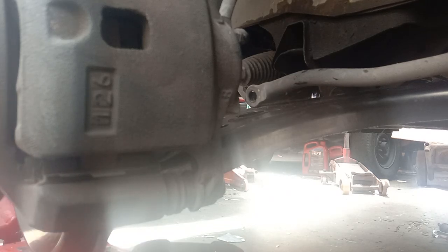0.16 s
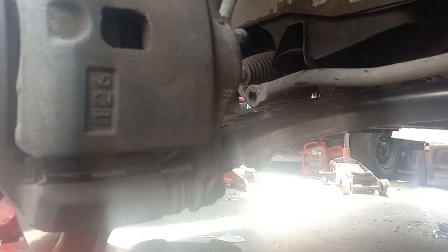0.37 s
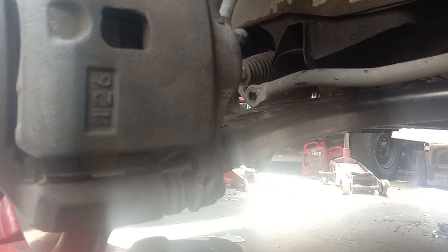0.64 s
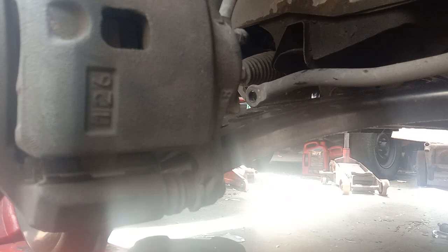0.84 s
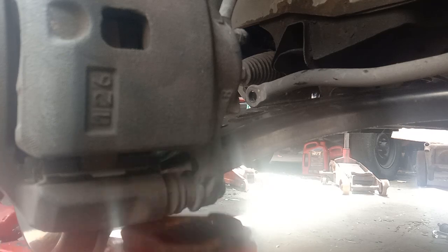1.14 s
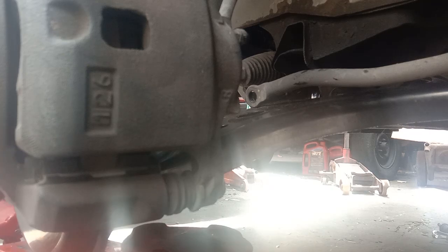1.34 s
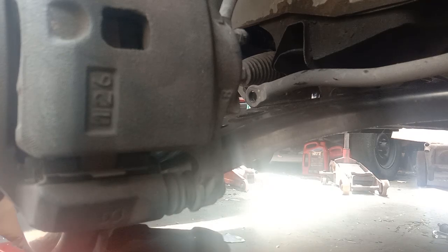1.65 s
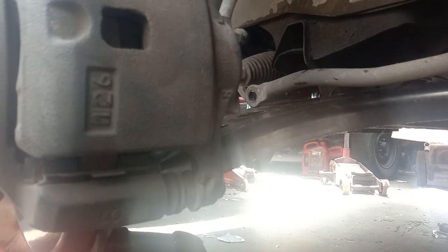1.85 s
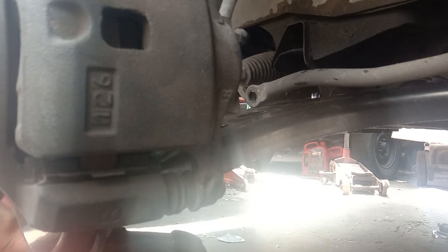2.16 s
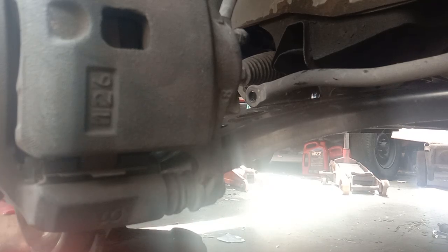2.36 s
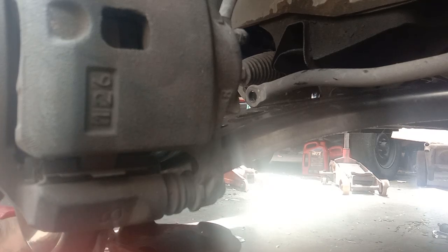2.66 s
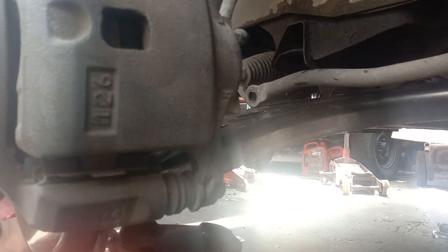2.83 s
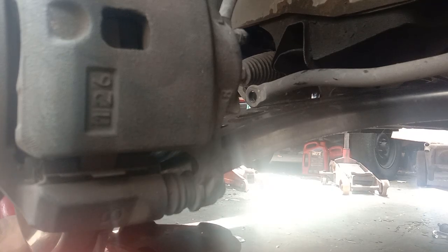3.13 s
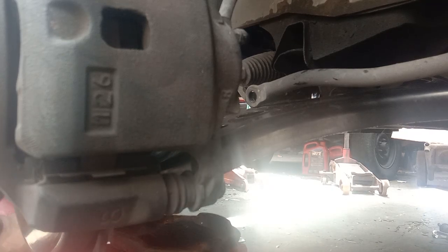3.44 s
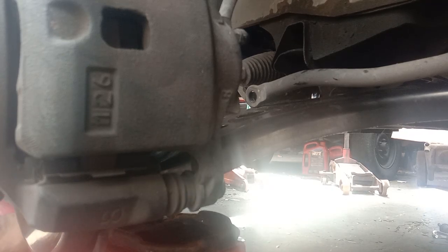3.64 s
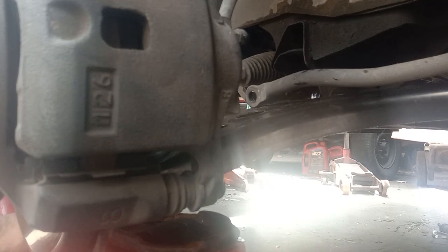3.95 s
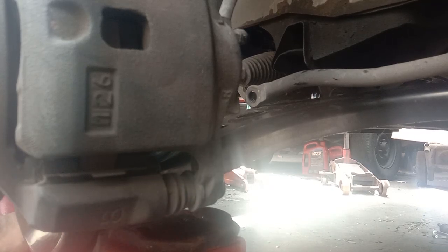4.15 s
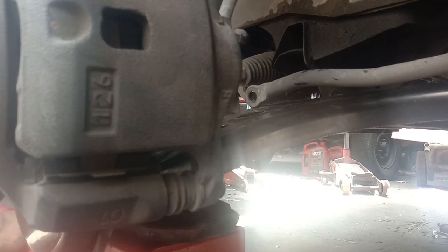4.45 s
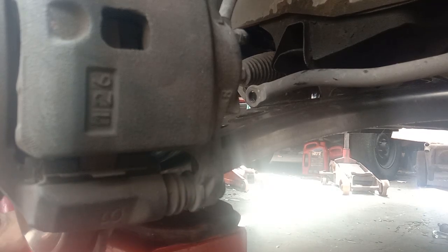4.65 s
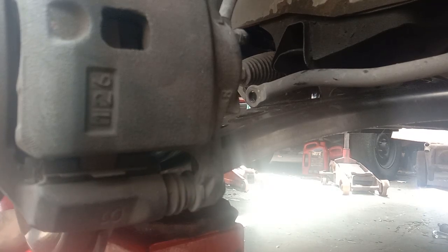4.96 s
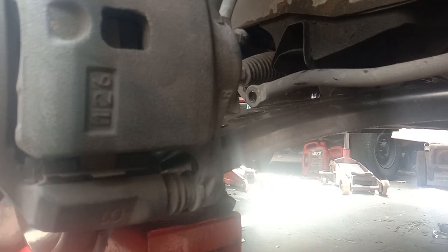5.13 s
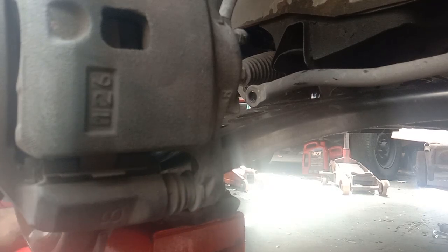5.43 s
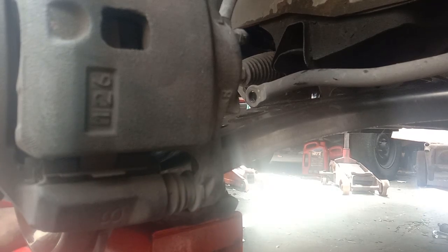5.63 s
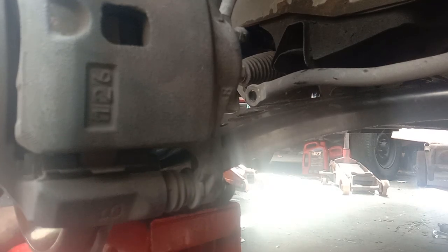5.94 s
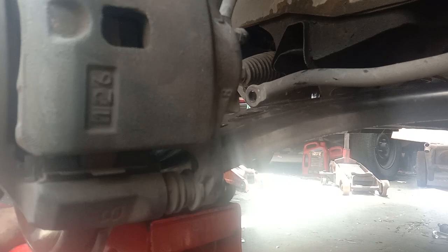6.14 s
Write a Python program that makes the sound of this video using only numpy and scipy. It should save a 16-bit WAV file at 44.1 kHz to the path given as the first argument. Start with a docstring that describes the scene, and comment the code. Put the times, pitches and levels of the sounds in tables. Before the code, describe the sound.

Close under a car in a hard-walled garage, a hydraulic jack is pumped four times, about one second apart. Each stroke has a brief gritty handle scrape and a heavy hollow metal bang, with bright linkage clanks on most strokes. The car body shudders and groans afterward. Then only ticks and dull suspension knocks remain, ending in a soft saddle rattle. Low rumble and faint hiss lie beneath.

```python
"""A hydraulic floor jack pumped under a car in a garage, heard from close to the wheel hub.
The handle scrapes (trains of slips) and bangs on its bottom stop (banded noise plus frame modes).
The linkage clanks and, last, the saddle rattles into its seat: contact noise, large-part ring, small-part ping.
Joints tick (short clicks), the suspension knocks (pitched noise) and the car's body groans (wavering tones).
Rumble and hiss lie underneath."""
import sys
import numpy as np
from scipy import signal
from scipy.fft import rfft, irfft, next_fast_len
from scipy.io import wavfile
from scipy.ndimage import uniform_filter1d, minimum_filter1d

SR = 44100
rng = np.random.default_rng(int(sys.argv[2]) if len(sys.argv) > 2 else 0)


def store_wav(level_fs):
    """Save 16-bit WAV to argv[1]."""
    pcm = np.round(np.clip(np.atleast_2d(level_fs), -1, 1) * 32767)
    wavfile.write(sys.argv[1], SR, pcm.T.astype(np.int16))


N = 277389
BANDS_HZ = 31.25 * 2 ** (np.arange(28) / 3)  # third-octave centres
AGE_S = np.arange(SR * 2 // 3) / SR  # time since an event's onset


def amp(db):
    """Decibels to gain."""
    return 10 ** (np.asarray(db) / 20)


def unit(x):
    """Scale to rms 1."""
    return x / np.sqrt(np.mean(x ** 2, axis=-1, keepdims=True) + 1e-20)


def along(points, hz):
    """Interpolate (f/Hz, value) points on a log frequency axis."""
    f, v = np.transpose(points)
    return np.interp(np.log(hz + 1), np.log(f + 1), v)


def filtered(x, response):
    """Multiply the spectrum of x by a response of frequency."""
    size = next_fast_len(x.shape[-1] + SR // 5)
    spectrum = rfft(x, size) * response(np.fft.rfftfreq(size, 1 / SR))
    return irfft(spectrum, size)[..., :x.shape[-1]]


def add(track, t_s, sound):
    """Mix a sound into the track at t_s, cut at the track's end."""
    space = track[round(t_s * SR):][:len(sound)]
    space += sound[:len(space)]


def wobble(knots_per_s, size):
    """Random curve, linear between Gaussian knots."""
    knots = rng.standard_normal(int(size * knots_per_s / SR) + 2)
    return np.interp(np.arange(size) * knots_per_s / SR, np.arange(len(knots)), knots)


def wavering(hz, rough, knots_per_s):
    """Tone whose strength and phase waver as reflections mix with it."""
    phase = 2 * np.pi * (hz * AGE_S + rng.random())
    depth = np.clip(rough, 0, 1) * np.sqrt(1 / 2)
    in_phase = np.sqrt(1 - depth ** 2) + depth * wobble(knots_per_s, len(AGE_S))
    quadrature = depth * wobble(knots_per_s, len(AGE_S))
    return in_phase * np.sin(phase) + quadrature * np.cos(phase)


def ringing(modes, rough, build_s):
    """Decaying modes with a gradual onset, each struck with a slightly new strength."""
    ring = np.zeros(len(AGE_S))
    for hz, db, t60_s in modes:
        fade = np.exp(-np.log(1000) * AGE_S / t60_s)
        # high modes waver faster, as their reflections drift in and out of step
        tone = wavering(hz, rough, knots_per_s=90 + hz / 40)
        ring += amp(db + rng.normal(0, 1)) * fade * tone
    return ring * (1 - np.exp(-AGE_S / build_s))


# underbody resonances that colour the noise of every contact: f/Hz, width/Hz, level/dB
UNDERBODY = [(101.6, 14, 7), (123.59, 2, 6.5), (243.02, 11, 2), (348.25, 240, 3.5), (571.03, 34, 10.5),
             (656.9, 11, 7.5), (754.91, 28, 9.5), (856.34, 14, 9), (1195.3, 3.6, 5), (1268.5, 84, 11.5),
             (1554.6, 44, 2), (2180.9, 41, 3), (2269.7, 65, 8.5), (2628, 22, 1), (3083.4, 150, 6.5),
             (3408.6, 74, 7.5)]


def band_noise():
    """Two seconds of noise per third-octave band, gathered around the underbody's resonances."""
    def response(hz):
        peaks_db = sum(db / (1 + (2 * (hz - centre) / width) ** 2) for centre, width, db in UNDERBODY)
        # many weaker resonances between the named ones
        ripple_db = 2.7 * np.interp(hz, np.arange(0, SR, 70), rng.standard_normal(SR // 70))
        band_steps = np.log2((hz + 1) / BANDS_HZ[:, None]) * 3
        band_power = np.clip(1 - abs(band_steps), 0, 1)
        return amp(peaks_db) * amp(ripple_db) * np.sqrt(band_power)

    return unit(filtered(rng.standard_normal(2 * SR), response))


# reverberation of the garage: f/Hz, t60/s
GARAGE = [(60, 1), (150, 0.68), (400, 0.44958), (1200, 0.5121), (2000, .44), (3000, 0.42692), (5500, 0.51),
          (9000, .24), (15000, 0.24)]


def dying(t60_s, room_db, bloom_cycles):
    """Envelope per band: struck part and garage decay at their own rates; low bands build slower."""
    own = amp(-60 * AGE_S / t60_s)
    room = amp(room_db) * amp(-60 * AGE_S / along(GARAGE, BANDS_HZ)[:, None])
    return np.hypot(own, room) * (1 - np.exp(-AGE_S * BANDS_HZ[:, None] / bloom_cycles))


def dense(noise, envelope):
    """Countless overlapping modes: a random stretch of noise per band, with its envelope's energy."""
    start = rng.integers(noise.shape[1] - len(AGE_S))
    bands = noise[:, start:start + len(AGE_S)] * envelope
    energy = lambda v: np.einsum("ij,ij->i", v, v)
    return bands * np.sqrt(energy(envelope) / energy(bands))[:, None]


def band_gains(colour, levels_db, edges_hz):
    """Share the level of each register among its bands, following a spectrum."""
    register = np.searchsorted(edges_hz, BANDS_HZ)
    power = amp(along(colour, BANDS_HZ)) ** 2 * BANDS_HZ
    share = power / np.bincount(register, power)[register]
    return amp(levels_db)[register] * np.sqrt(share)


# spectrum of the workshop air: f/Hz, level/dB per Hz
FLOOR = [(25, -29.5), (50, -9.5), (75, -0.5), (130, 3), (260, -14.5), (570, -20.5), (680, -23.5),
         (800, -17), (1000, -29.5), (1250, -23), (1800, -35.5), (3000, -39), (7800, -55.5), (15800, -50.5)]


def background():
    """Workshop air: an uneven low rumble under a nearly steady hiss."""
    air = unit(filtered(rng.standard_normal(N), lambda hz: amp(along(FLOOR, hz))))
    rumble = filtered(air, lambda hz: 1 / (1 + (hz / 1500) ** 4))
    hiss = air - rumble
    drift = wobble(5, N)
    return amp(-61.5 + 7.8 * drift) * rumble + amp(-59.5 + 2 * drift) * hiss


# handle rubbing on its way to each end of its travel: t/s, length/s, grip/s, grip level/dB, push level/dB
SCRAPES = [(0.306, 0.09603, 0.066, -35, -38), (1.181, 0.124, 0.06016, -34, -39),
           (1.502, 0.10133, 0.021965, -40.5, -29.5), (2.497, .112, .028, -33, -29),
           (3.494, .119, .012, -51.5, -33)]
# spectrum of a slip: f/Hz, level/dB per Hz
SCRAPE_COLOUR = [(29, -37.5), (50, -8), (119, 6), (283, -7.5), (360, 4), (674, -7.5), (1290, -4.5),
                 (1720, -13), (2300, -19), (2470, -14.5), (5220, -41), (8050, -65.5), (15800, -50.5)]
SLIDE_DB, PUSH_S, SLIPS_PER_S = -7, .027, 720  # easing after the grip, length of the last push, mean slip rate


def scrapes(noise):
    """Runs of tiny slips: the handle grips, slides more easily, then is pushed home."""
    track = np.zeros(N)
    envelope = dying(t60_s=.04, room_db=-12.5, bloom_cycles=0.7751)
    response = band_gains(SCRAPE_COLOUR, [0], []) @ dense(noise, envelope)
    response /= np.linalg.norm(response)
    for t_s, length_s, grip_s, grip_db, push_db in SCRAPES:
        phases = [AGE_S < grip_s, AGE_S < length_s - PUSH_S]
        force_db = np.select(phases, [grip_db, grip_db + SLIDE_DB], push_db)
        pressure = amp(force_db) * (1 - np.exp(-AGE_S / 0.0048)) * (AGE_S < length_s)
        slips = (rng.random(len(AGE_S)) < SLIPS_PER_S / SR) * rng.standard_normal(len(AGE_S))
        add(track, t_s, signal.fftconvolve(pressure * unit(slips), response))
    return track


# louder ticks of lifting arm and suspension: t/s, level/dB, treble over level/dB
TICKS = [(0.326, -39, -1.5), (0.875, -46, -11), (1.199, -40, 2.5), (2.004, -47.5, -4), (2.055, -46.5, -10),
         (2.254, -63, 2), (2.368, -50, -21), (2.477, -51, -16.5), (2.886, -47, -15), (2.995, -52, -0.5),
         (3.15, -49.5, -8.5), (3.337, -55.5, -14), (3.962, -58, -2.5), (4.135, -59, -21),
         (4.429, -58, -2.5), (4.462, -51, -4), (4.534, -47, -9), (4.642, -52, -4.5), (4.859, -53, -4),
         (4.961, -52, -2.5), (5.193, -51, -2.5), (5.296, -60.5, 3.5), (5.355, -41, -13), (5.609, -54, -9),
         (5.769, -50.5, -9.5), (5.881, -45.5, -11)]
# spectrum of a tick: f/Hz, level/dB per Hz
TICK_COLOUR = [(40, -13.5), (90, 2.5), (300, -5), (800, -6.5), (1280, -3.5), (1700, -1.5), (2400, -5),
               (3500, -16.5), (5000, -26.5), (6300, -48.5), (8000, -47.5), (15000, -49.5)]
TICK_THUMP_DB = 2.5  # low register over the middle
FAINT_PER_S, FAINT_DB, FAINT_SPREAD_DB, FAINT_BRIGHT_DB = 3.1, -67.5, 1.5, -12.5
# weaker slips around each tick
CLUSTER_LEAD_S, CLUSTER_LAG_S, CLUSTER_DB, CLUSTER_FALL_DB_PER_S = .014, .028, -7, 450.5


def ticks(noise):
    """Joints slip by a hair: clicks of varied colour in clusters of weaker ones; faint ones fall at random."""
    track = np.zeros(N)
    envelope = dying(t60_s=0.095035, room_db=-17, bloom_cycles=0.97)
    faint = []
    for _ in range(int(FAINT_PER_S * N / SR)):
        faint.append((rng.random() * N / SR, rng.normal(FAINT_DB, FAINT_SPREAD_DB), FAINT_BRIGHT_DB))
    for t_s, db, bright_db in list(TICKS) + faint:
        colour = amp(2.5 * rng.standard_normal(len(BANDS_HZ)))
        registers_db = [db + TICK_THUMP_DB, db, db + bright_db]
        gains = colour * band_gains(TICK_COLOUR, registers_db, [400, 1500])
        click = gains @ dense(noise, envelope)
        add(track, t_s, click)
        for offset_s in rng.uniform(-CLUSTER_LEAD_S, CLUSTER_LAG_S, size=6):
            offset_db = CLUSTER_DB - CLUSTER_FALL_DB_PER_S * abs(offset_s)
            add(track, max(t_s + offset_s, 0), amp(offset_db) * click)
    return track


# spectrum of steel on steel: f/Hz, level/dB per Hz
CLANK_COLOUR = [(29, -57), (50, -20), (119, -3.5), (263, -8.5), (597, -3), (690, -9.5), (1490, -3),
                (1680, -8.5), (1990, -10.5), (3470, -9.5), (4630, -36), (5220, -25), (7860, -40),
                (11800, -32.5), (15800, -30)]
# register levels of the softest and hardest contact: thump/dB, clash/dB, bite/dB, sizzle/dB
SOFT = (12.5, 5, -4.5, -34)
HARD = (-16.5, -3.5, .5, -17.5)


def rattle(noise, contacts, body_modes, ping_modes, envelope, rough):
    """Steel on steel: harder contacts thump less and sizzle more; a large part rings, a small one pings."""
    track = np.zeros(N)
    for t_s, db, hardness, ring_db, ping_db in contacts:
        registers_db = db + np.add(SOFT, hardness * np.subtract(HARD, SOFT))
        clash = band_gains(CLANK_COLOUR, registers_db, [400, 1500, 6000]) @ dense(noise, envelope)
        ring = amp(db + ring_db) * ringing(body_modes, rough, build_s=.004)
        ping = amp(db + ping_db) * ringing(ping_modes, rough, build_s=0.0018)
        add(track, t_s, clash + ring + ping)
    return track


# linkage contacts: t/s, level/dB, hardness/0-1, ring over level/dB, ping over level/dB
CLANKS = [(0.409, -28.5, 0.13, -10, -35.5), (0.414, -25.5, 0.61, -8.5, -27),
          (0.429, -27.5, 0.65, -7.5, -32), (0.451, -25, 0.89, -9.5, -10.5), (1.298, -19, 0.47, -12.5, -36),
          (1.336, -23.5, 1, 3.5, -17), (1.372, -39, .6, 6, -20.5), (3.662, -30.5, 0.1, -10.5, -41),
          (3.669, -24.5, 0.48, -13, -25), (3.697, -29.5, 0.63, -2, -8)]
# linkage modes: f/Hz, level/dB, t60/s
LINKAGE = [(1112.7, -7.5, 0.14), (1280.3, -11, 0.39), (1507, -7, 0.2), (2036, 3, 0.16), (2250, -6.5, 0.16),
           (2325, -9, 0.18), (2487.9, -1, 0.22), (2800, -15, .18), (3180, -9, .15), (3365.5, -2, 0.12),
           (3570, -17.5, 0.31), (4216, -31, 0.44), (5259.8, -25.5, 0.36), (6400, -35, 0.22),
           (7169, -40, 0.33), (11654, -27, 0.12), (11448, -18.5, .1), (11700, -25, .16), (12600, -26, .14),
           (14640, -25.5, .17), (15080, -23.5, .13)]
# modes of the small part that pings: f/Hz, level/dB, t60/s
COLLAR = [(5376.5, 3, 0.21), (5451, -18, 0.37), (9420, -24.5, 0.12)]


def linkage_clanks(noise):
    """Linkage parts collide; the linkage rings and its collar pings."""
    envelope = dying(t60_s=0.16351, room_db=-21.0, bloom_cycles=1.0)
    return rattle(noise, CLANKS, LINKAGE, COLLAR, envelope, rough=0.4)


# handle on its bottom stop: t/s, level/dB
BANGS = [(0.586, -27), (1.614, -24.5), (2.614, -25.5), (3.616, -26.5)]
# modes of the frame and the space under the car: f/Hz, level/dB, t60/s
FRAME = [(80.507, -9.5, 0.75), (110.06, -7.5, .6), (134.05, 0, .55), (231.68, -1.5, 0.25), (337, -11, 0.56),
         (415.4, -18.5, 0.39), (534.63, 0, 0.22), (574.96, -5, 0.23), (682.01, -3.5, 0.28),
         (773.26, -6, 0.32), (918.49, -11.5, 0.3), (1121.4, -7, 0.21), (1226.3, -15, 0.26),
         (2065.5, -21.5, 0.28), (2319.6, -19.5, 0.37)]
# spectrum of a bang: f/Hz, level/dB per Hz
BANG_COLOUR = [(21, -50), (35, -21.5), (143, 0), (324, -14.5), (408, -7.5), (488, -24.5), (554, -9.5),
               (856, -21.5), (924, -27.5), (1260, -18), (1580, -37.5), (2320, -29.5), (4630, -53),
               (7720, -75.5), (15800, -55.5)]
# first crack and its returns from floor and underbody: delay/s, level/dB
SLAPS = [(0, 5), (.008, -4.5), (.016, 1)]


def bangs(noise):
    """The stop is hit at the same spot each stroke, so all bangs share nearly one response."""
    track = np.zeros(N)
    low = dying(t60_s=0.36307, room_db=-9.0, bloom_cycles=2.6)
    high = dying(t60_s=0.17, room_db=-6, bloom_cycles=0.9403)
    envelope = np.where(BANDS_HZ[:, None] < 300, low, high)
    gains = band_gains(BANG_COLOUR, [-2.5, -6.0, -16.5, -35.0], [400, 1500, 6000])
    boom = amp(-5.0) * ringing(FRAME, rough=0.34, build_s=0.0056)
    shared = gains @ dense(noise, envelope) + boom
    crack = dying(t60_s=.016, room_db=-55.0, bloom_cycles=0.6)
    for delay_s, db in SLAPS:
        add(shared, delay_s, amp(db) * gains @ dense(noise, crack))
    for t_s, db in BANGS:
        fresh = 0.23 * gains @ dense(noise, envelope)
        add(track, t_s, amp(db) * unit(shared + fresh))
    return track


# groans of the car's body under a shift of weight: t/s, length/s, f/Hz, level/dB
GROANS = [(1.875, 0.10893, 227.9, -27.5), (5.144, 0.0352, 107.2, -44.5), (5.928, 0.07, 139.5, -36),
          (6.003, 0.1, 85.42, -35)]
# the body rocks back after each bang; level is over the bang's
SHUDDER_DELAY_S, SHUDDER_S, SHUDDER_HZ, SHUDDER_DB = 0.21, 0.10131, 124.51, -8.5
GROAN_OVERTONE_RATIO, GROAN_OVERTONE_DB = 1.5, -15


def groans():
    """The body shudders unevenly after each bang and groans as its weight shifts: swelling rough tones."""
    track = np.zeros(N)
    shudders = [(t_s + SHUDDER_DELAY_S, SHUDDER_S, SHUDDER_HZ, db + SHUDDER_DB) for t_s, db in BANGS]
    for t_s, length_s, hz, db in shudders + list(GROANS):
        swell = np.sin(np.pi * np.clip(AGE_S / length_s, 0, 1) ** .7)
        tone = wavering(hz, rough=.8, knots_per_s=hz / 2)
        overtone = wavering(GROAN_OVERTONE_RATIO * hz, rough=.8, knots_per_s=hz / 2)
        add(track, t_s, amp(db) * swell * (tone + amp(GROAN_OVERTONE_DB) * overtone))
    return track


# dull knocks of the suspension taking the load: t/s, level/dB, f/Hz, hub ring over level/dB
KNOCKS = [(1.861, -27, 913.5, -17.5), (2.138, -44, 917.3, -13.5), (4.655, -43, 494, -27.5),
          (4.961, -47, 1280, -22), (5.351, -32, 595, -8.5), (5.479, -38.5, 709.8, -1),
          (5.884, -37.5, 1286, -19.5), (5.962, -37, 698.7, -26.5)]
# wheel hub modes: f/Hz, level/dB, t60/s
HUB = [(822.9, -13.5, 1.1), (2223.7, -19.5, 0.31)]
KNOCK_OVERTONE_RATIO, KNOCK_OVERTONE_DB = 1.4194, -11


def knocks(noise):
    """Cushioned contacts sound around one pitch and its overtone, and set the hub ringing."""
    track = np.zeros(N)
    envelope = dying(t60_s=0.1, room_db=-20.5, bloom_cycles=7.198)
    around = lambda hz: np.exp(-(np.log2(BANDS_HZ / hz) / .26) ** 2)
    for t_s, db, hz, ring_db in KNOCKS:
        gains = around(hz) + amp(KNOCK_OVERTONE_DB) * around(KNOCK_OVERTONE_RATIO * hz)
        thud = gains @ dense(noise, envelope)
        ring = amp(ring_db) * ringing(HUB, rough=0.9976, build_s=.01)
        add(track, t_s, amp(db) * (thud + ring))
    return track


# saddle slipping into its seat: t/s, level/dB, hardness/0-1, ring over level/dB, ping over level/dB
SEATING = [(5.964, -47.5, 0.18, 2.5, -1), (6.016, -40.5, 0.26, 3, -20), (6.054, -38, 0.37, 7, -28.5),
           (6.069, -34.5, 0.33, -3.5, -25.5), (6.113, -45, 0.32, -3, -19)]
# saddle modes: f/Hz, level/dB, t60/s
SADDLE = [(1285.2, 5.5, 0.20197), (1547.7, -5, 0.2392), (1753.6, -11.5, 0.23), (2590.3, -12, 0.18),
          (3146, -13.5, 0.094), (3496, -39, .2)]
# saddle pin modes: f/Hz, level/dB, t60/s
SADDLE_PIN = [(2838.5, 2, 0.37), (5174, -12, 0.5988), (5340, -18.5, 0.42), (7080, -26, 0.44),
              (9199, -10.5, 0.275), (10121, -9.5, 0.2166), (11310, -12, 0.31), (12300, -18, .35),
              (14757, -8, 0.29), (15570, -12, 0.36)]


def saddle_rattle(noise):
    """The saddle slips into its seat in several contacts; it rings and its pin pings."""
    envelope = dying(t60_s=0.15908, room_db=-24.5, bloom_cycles=1.251)
    return rattle(noise, SEATING, SADDLE, SADDLE_PIN, envelope, rough=0.8706)


def scene():
    """The jack, the car above it and the room."""
    noise = band_noise()
    jack = scrapes(noise) + linkage_clanks(noise) + bangs(noise) + saddle_rattle(noise)
    car = ticks(noise) + groans() + knocks(noise)
    return (background() + jack + car)[None]


def record(dry):
    """A look-ahead limiter holds down the loudest peaks; deep bass and the extreme top are cut."""
    needed = np.minimum(1, .49 / (np.abs(dry) + 1e-9))
    gain = uniform_filter1d(minimum_filter1d(needed, size=265), size=177)
    bass_cut = signal.butter(N=3, Wn=48, btype="high", fs=SR, output="sos")
    thinned = signal.sosfilt(bass_cut, dry * gain)
    top_hz = 15750
    return filtered(thinned, lambda hz: np.clip((top_hz - hz) / 400 + .5, 0, 1))


dry = scene()
out = record(dry)
store_wav(out)
```